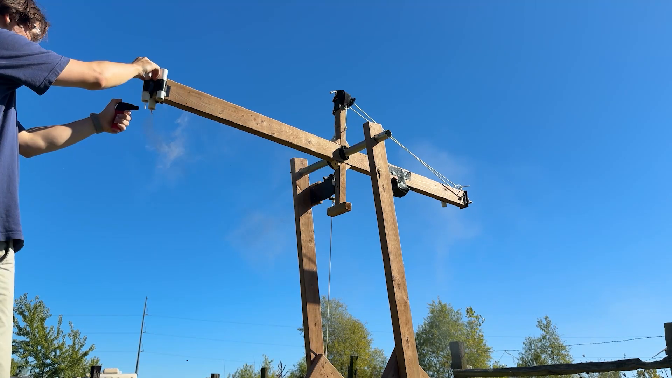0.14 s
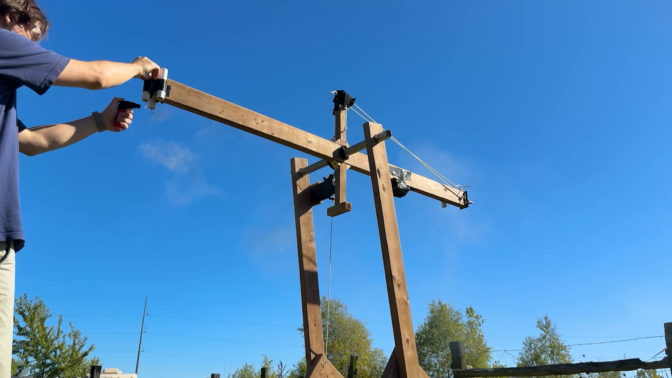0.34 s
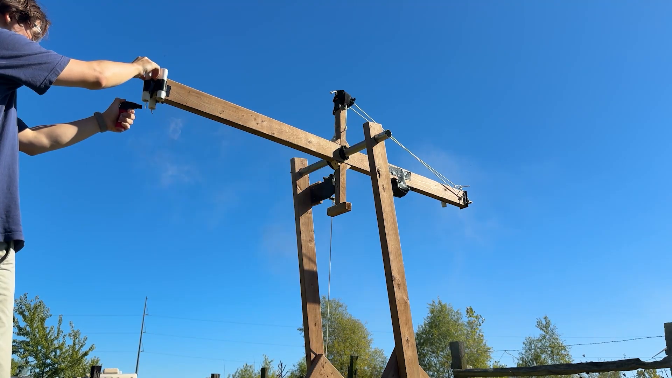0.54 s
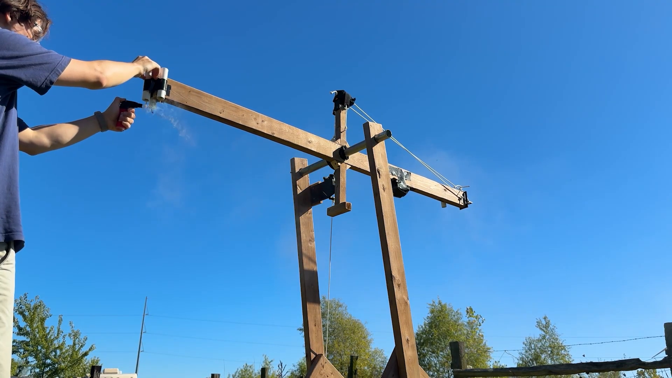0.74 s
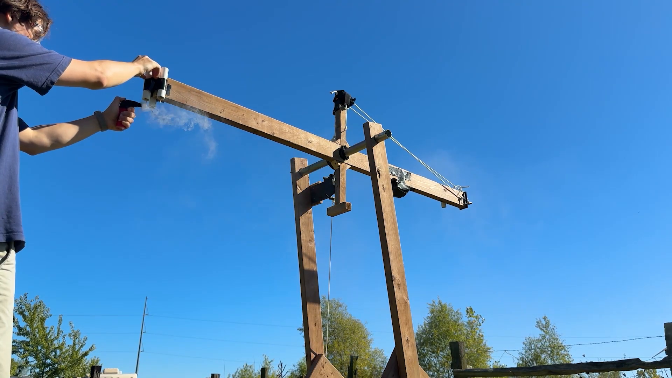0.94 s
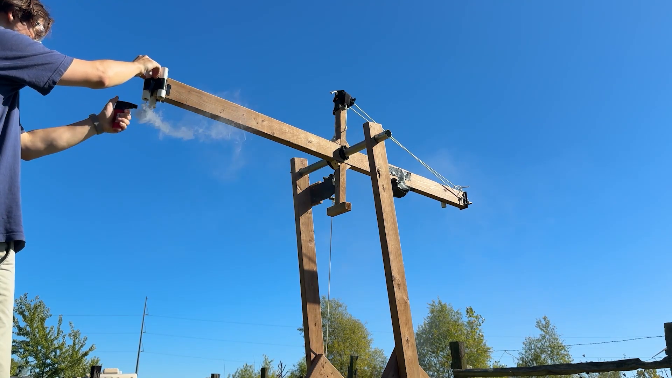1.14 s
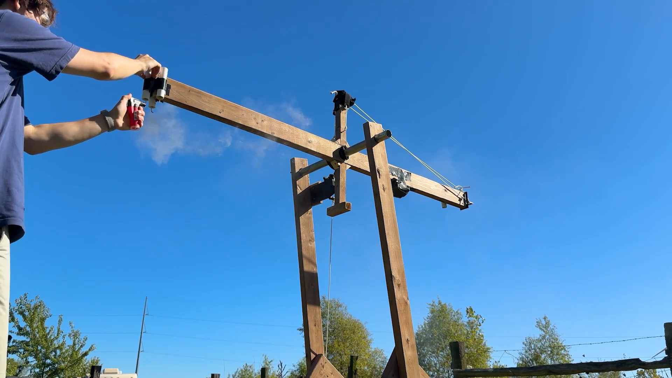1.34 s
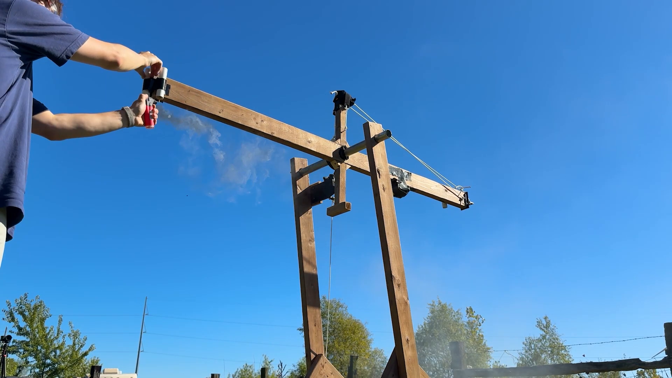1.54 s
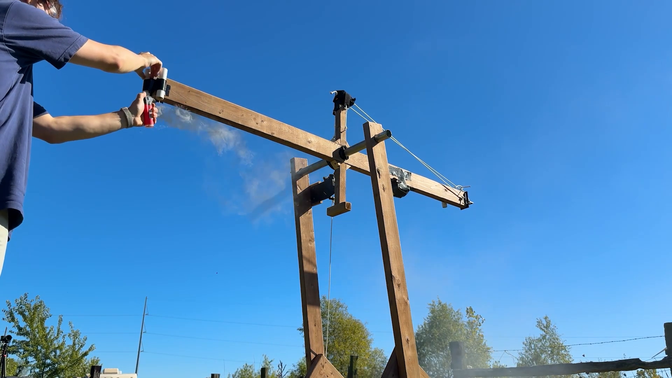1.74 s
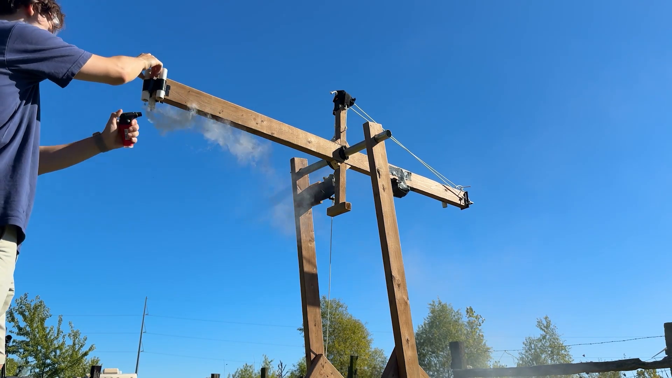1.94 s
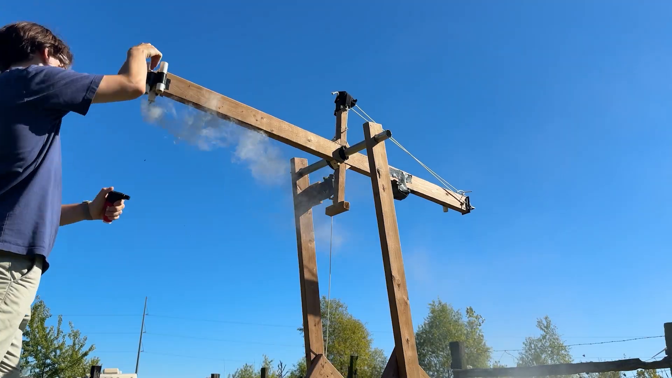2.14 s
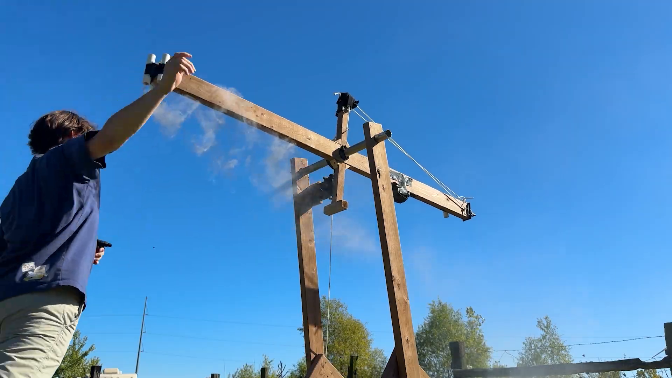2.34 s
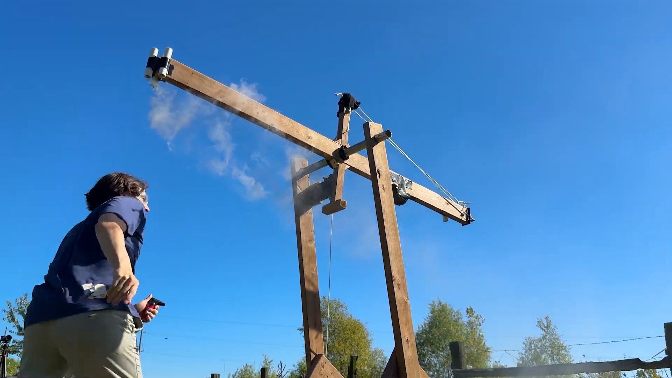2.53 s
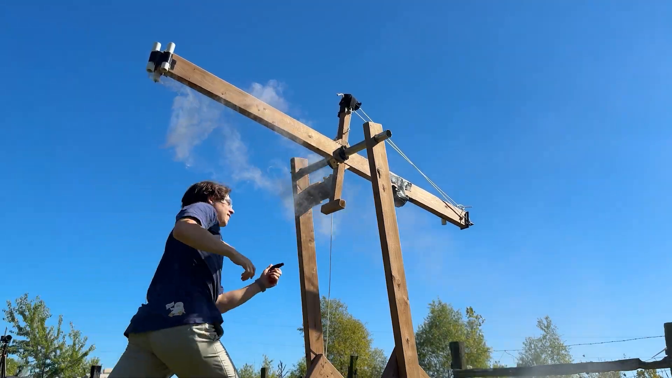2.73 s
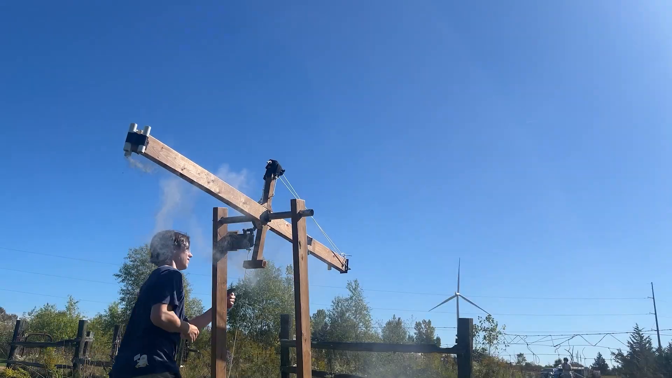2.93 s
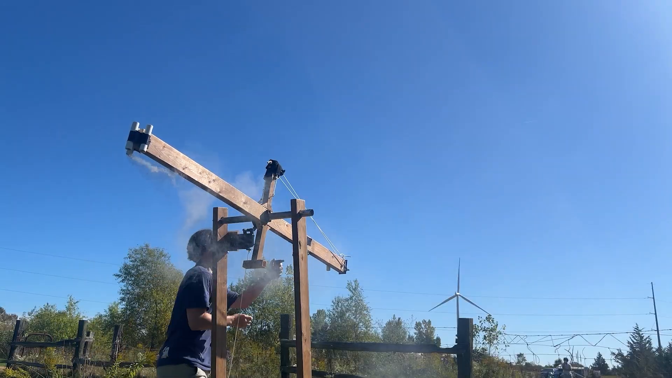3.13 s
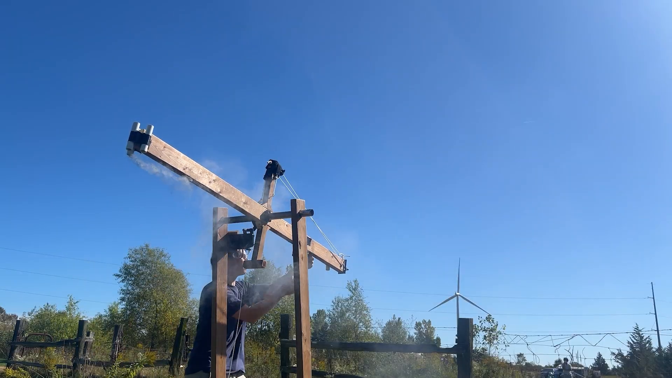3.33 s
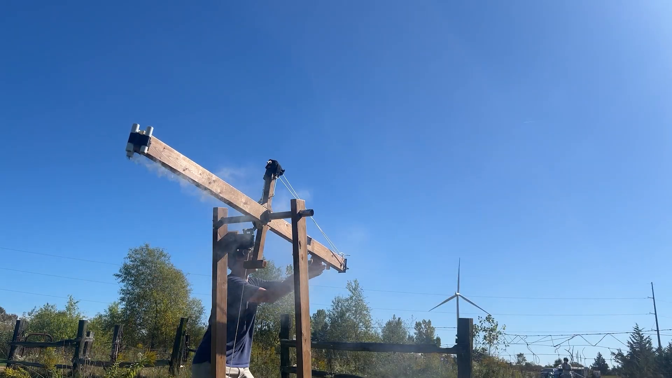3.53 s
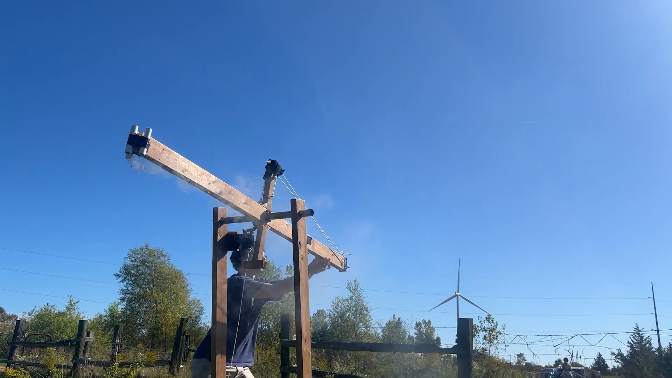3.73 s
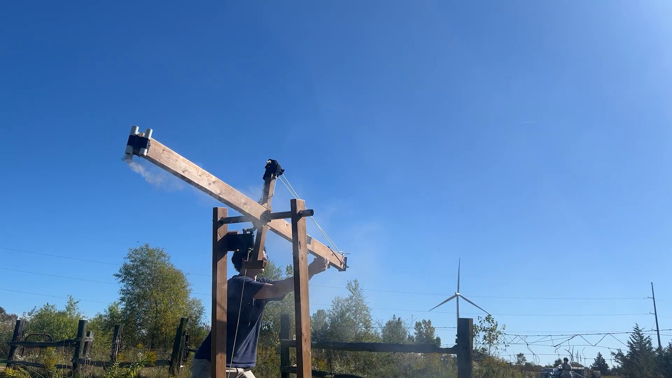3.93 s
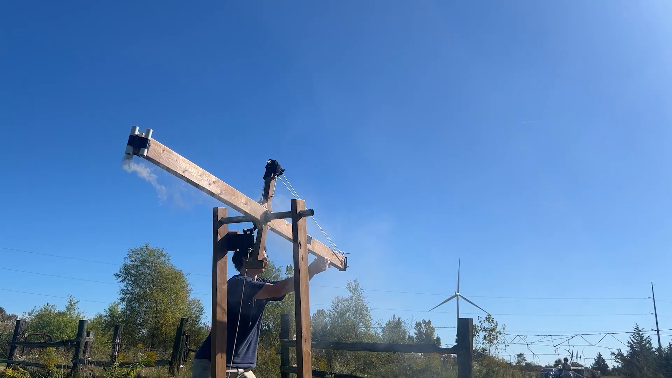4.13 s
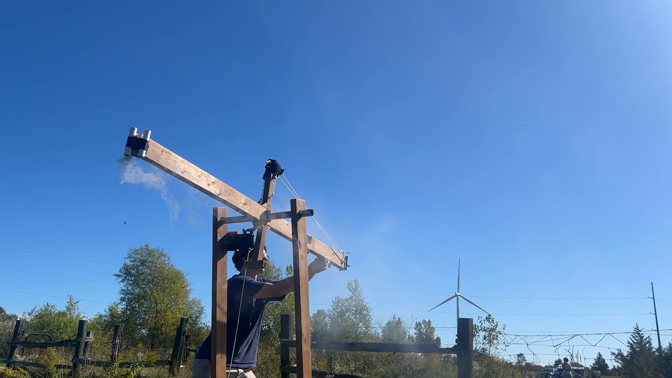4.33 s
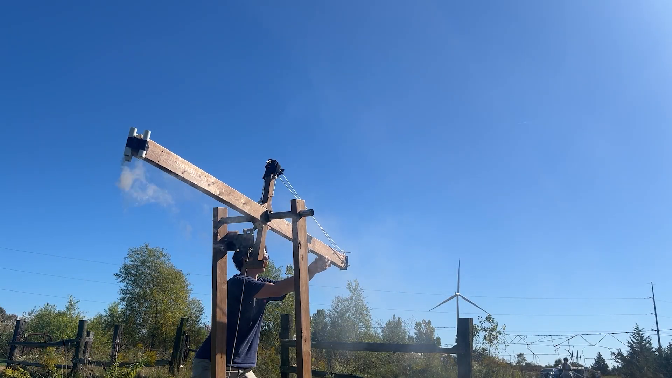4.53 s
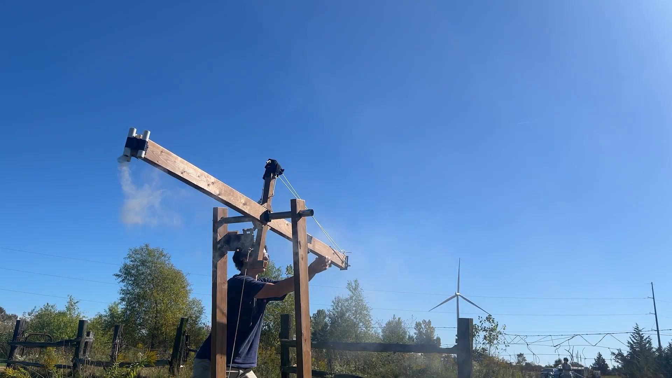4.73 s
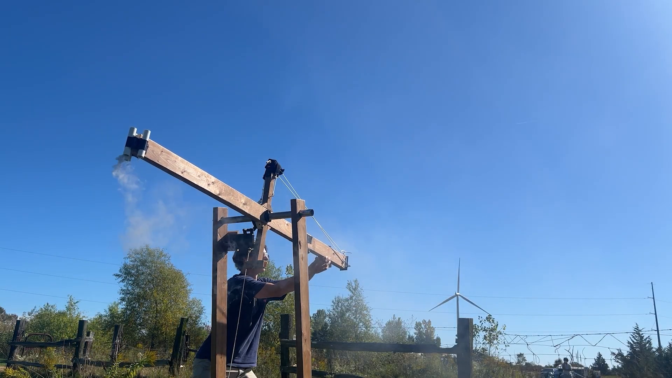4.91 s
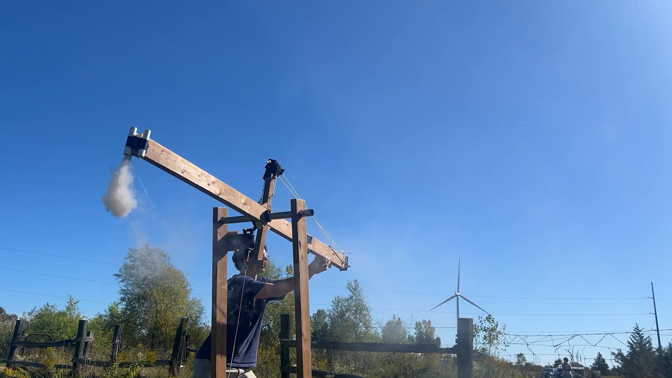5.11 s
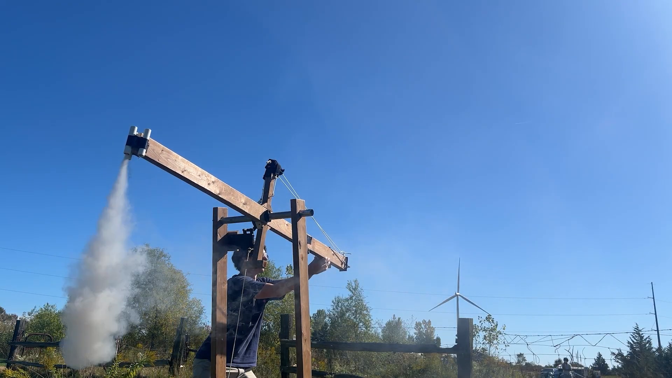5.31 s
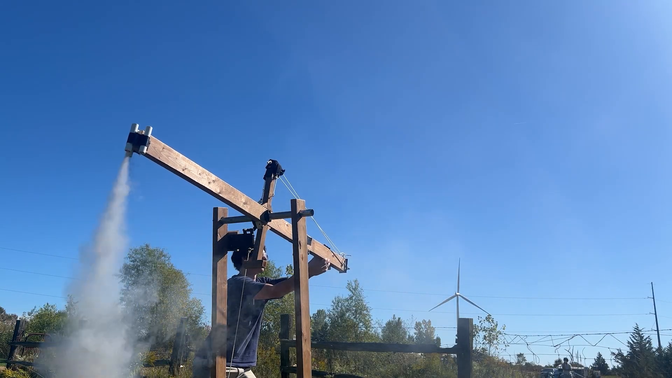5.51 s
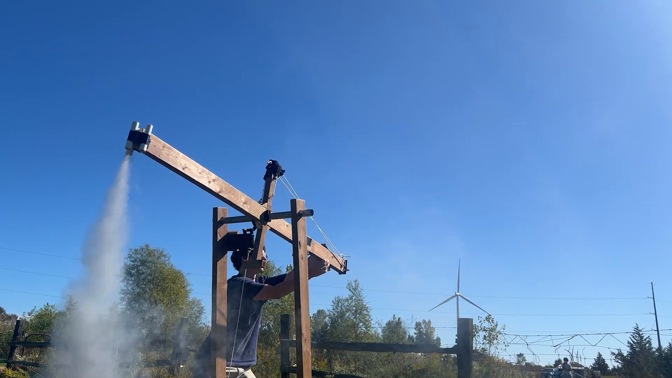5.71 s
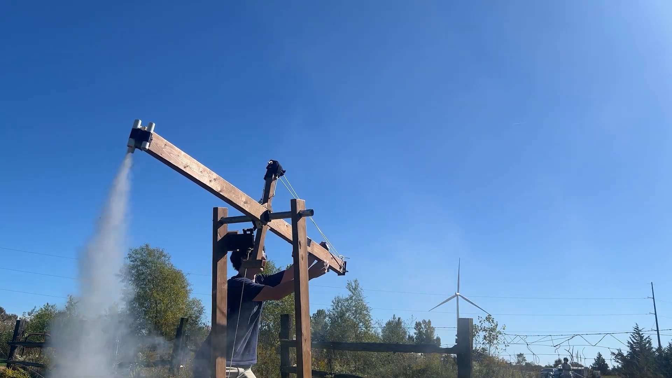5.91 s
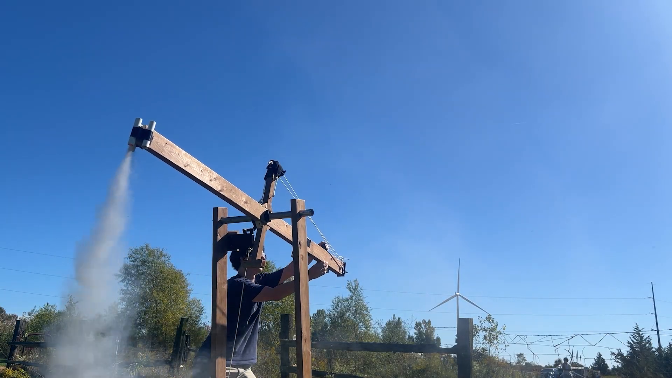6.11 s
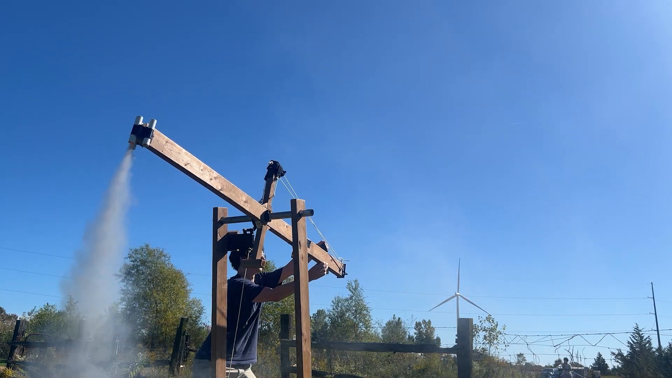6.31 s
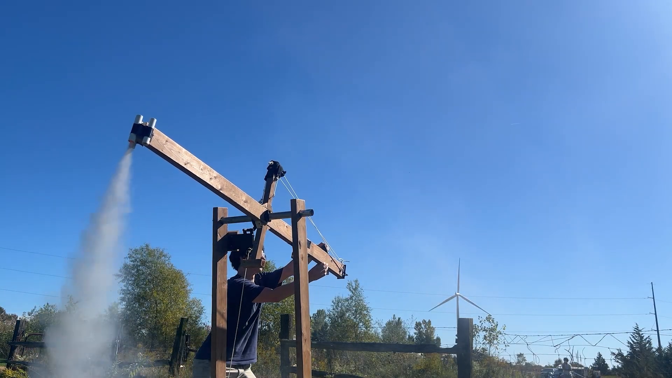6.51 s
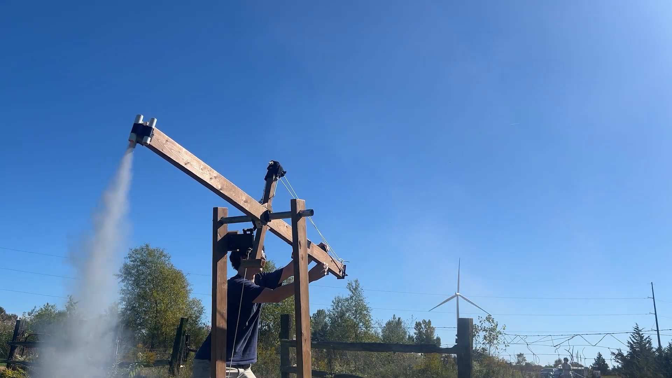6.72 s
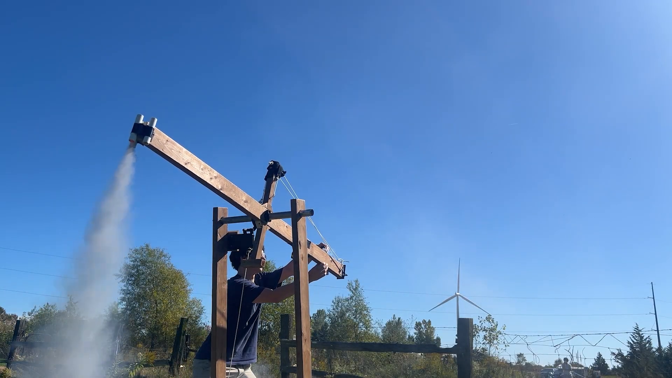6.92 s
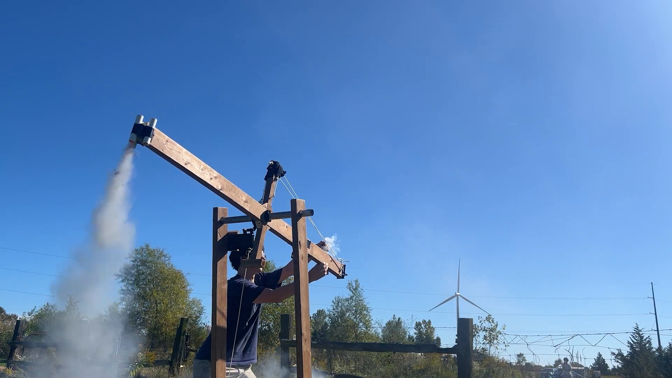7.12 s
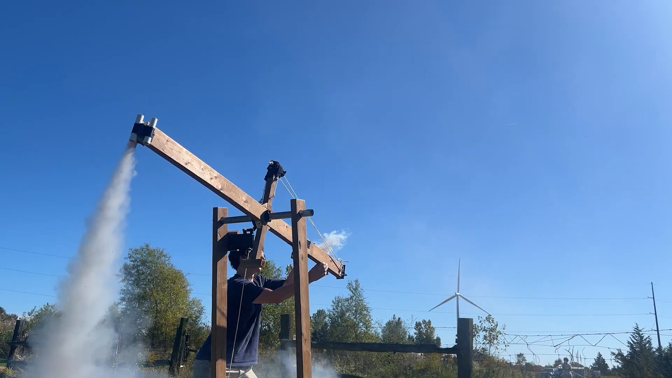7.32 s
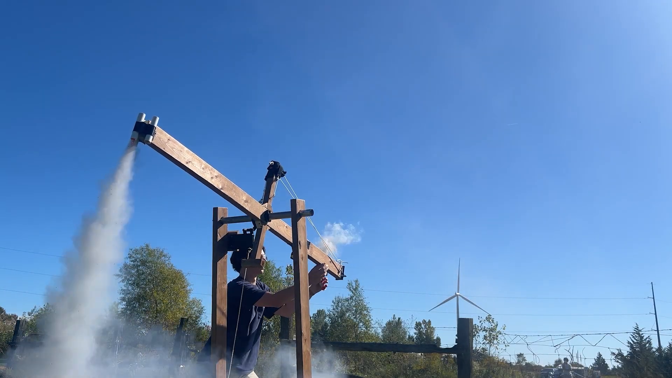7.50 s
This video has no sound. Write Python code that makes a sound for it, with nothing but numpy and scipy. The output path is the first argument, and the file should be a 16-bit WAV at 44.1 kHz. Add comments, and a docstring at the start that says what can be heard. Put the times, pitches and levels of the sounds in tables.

```python
"""A fuse sizzles on a small rocket motor on a wooden beam in a field; then the motor lights and roars.
Fuse, flame and jet are noise with moving spectra; two crickets chirp in trains of gliding tones.
A lighter clicks with damped modes; feet thump and rustle in the grass over a far hum and low rumble.
At 2.8 s the view cuts to a place farther off, where the burning also has its ground echo."""
import sys
import numpy as np
from scipy import signal
from scipy.fft import rfft, irfft
from scipy.io import wavfile
from scipy.ndimage import uniform_filter1d

SR = 44100
rng = np.random.default_rng(int(sys.argv[2]) if len(sys.argv) > 2 else 0)


def unload_wav(signal):
    """Save mono or channel-first audio to the path in sys.argv[1] as 16-bit WAV at rate SR, clipped to [-1, 1]."""
    wavfile.write(
        sys.argv[1],
        SR,
        np.round(np.clip(np.atleast_2d(signal).T, -1, 1) * 32767).astype(np.int16),
    )


N = 337613
CUT_S = 2.802  # the view cuts to a place farther off


def gain_of(db):
    """dB to gain."""
    return 10 ** (np.asarray(db) / 20)


def evened(x):
    """Scales to rms 1."""
    return x / np.sqrt(np.mean(x ** 2) + 1e-20)


def spectrum_at(points, hz):
    """Spectrum in dB, straight between points on a log-frequency axis."""
    point_hz, db = np.transpose(points)
    return np.interp(np.log(hz + 1), np.log(point_hz + 1), db)


def follow(rows, x):
    """Columns of a curve, interpolated at x along its first column."""
    row_x, *columns = np.transpose(rows)
    return [np.interp(x, row_x, column) for column in columns]


def add(mix, start_s, sound):
    """Adds a two-channel sound at start_s, cut to the mix."""
    i = round(start_s * SR)
    part = mix[:, max(i, 0):i + sound.shape[1]]
    part += sound[:, max(-i, 0):][:, :part.shape[1]]


def wander(t, top_hz):
    """Slow random drift of rms 1: 24 sines of random phase, the slower ones stronger."""
    total = 0
    for hz in np.geomspace(top_hz / 30, top_hz, 24):
        total = total + np.sin(2 * np.pi * (hz * t + rng.random())) / np.sqrt(hz)
    return evened(total)


# Stereo of the noise, near and far. Each row: frequency in Hz, phase lead of the left in radians,
# left minus right level in dB, likeness of the two channels from 0 to 1.
STEREO_NEAR = [(0, 0, -1.5, .98), (300, .4, -1.5, .97), (860, 1.34, 6.8, .87), (1550, 2, 3, .9),
               (2100, 2.1, .5, .93), (2420, 2.75, 0, .95), (2650, 3.12, 0, .999), (3300, 3.16, 0, .999),
               (4480, 5.4, 4.4, .64), (5690, 4.8, 4.4, .55), (6890, 6.27, .2, .9), (7750, 7, .3, .66),
               (9300, 6.28, 0, .99), (9990, 6.1, .1, .83), (10340, 5.1, 0, .66), (11700, 4.2, 0, .8),
               (12100, 3.16, 0, .999), (13800, 3.12, 0, .999), (14300, 2.3, .2, .7), (15850, .65, 0, .7)]
STEREO_FAR = [(0, 0, -2.5, .98), (300, .5, -1.5, .98), (520, 1, -.3, .98), (700, 1.36, 2.4, .98),
              (860, 1.45, 4.3, .97), (1030, 1.42, 4.8, .96), (2300, 2.65, -1, .9), (2580, 3.12, 0, .999),
              (2980, 3.16, 0, .999), (3500, 4, 2.5, .87), (4650, 5.7, 3.6, .83), (5860, 5.67, 6.1, .73),
              (7580, 6.46, .5, .88), (8440, 7.46, -1.5, .46), (9470, 5.44, 1.6, .65), (9900, 3.2, 4.5, .7),
              (10400, 3.16, 0, .998), (10950, 3.12, 0, .998), (12500, .45, .8, .72), (13440, 0, 0, .99),
              (15850, -2.4, 0, .55)]


def hiss(near, far, tilt_rows, patchy_db, flicker_db, size=512):
    """Turbulent noise: random short-time spectra, stereo set per frequency; rms 1."""
    hop = size // 4
    t = np.arange(N // hop + 2) * hop / SR
    hz = np.fft.rfftfreq(size, 1 / SR)
    a, b, c, d, patches = rng.standard_normal((len(t), len(hz), 5)).T
    patches = uniform_filter1d(patches, size=6, axis=0)
    patches = evened(uniform_filter1d(patches, size=20, axis=1))

    is_far = t > CUT_S
    stereo_near = np.array(follow(STEREO_NEAR, hz))[..., None]
    stereo_far = np.array(follow(STEREO_FAR, hz))[..., None]
    lead, balance_db, same = np.where(is_far, stereo_far, stereo_near)
    same = np.clip(same, 0, 1)
    right = a + 1j * b
    left = same * right + np.sqrt(1 - same ** 2) * (c + 1j * d)
    left = left * np.exp(1j * lead)

    db = np.where(is_far, spectrum_at(far, hz)[:, None], spectrum_at(near, hz)[:, None])
    octaves = np.log2((hz[:, None] + 100) / 4000)
    db = db + octaves * follow(tilt_rows, t)[0]
    balance = np.array([gain_of(balance_db / 2), gain_of(-balance_db / 2)])
    # evens the frames before patches and flicker
    mean_power = (gain_of(db) ** 2 * (balance ** 2).mean(0)).mean(0)
    db = db + patchy_db * patches + flicker_db * rng.standard_normal(len(t))
    frames = np.array([left, right]) * balance * gain_of(db) / np.sqrt(mean_power)
    return evened(signal.istft(frames, nperseg=size, noverlap=size - hop)[1][:, :N])


# Sizzle over time. Each row: time in seconds, level in dB, tilt in dB per octave.
FUSE_CURVE = [(0.05, -43.5, 1), (0.052, -49, 3), (0.516, -60, 0), (0.634, -52, 0), (0.976, -43.5, 0.5),
              (1.16, -42, 0), (1.464, -42, 4), (1.466, -49, -2.5), (2.05, -41.5, 2), (2.632, -49, 2.5),
              (2.8, -45.5, 8), (2.802, -63, -0.5), (3.14, -53.5, 6), (3.36, -59, 3.5), (4.32, -54, 5.5),
              (4.59, -54, 2.5), (4.78, -55.5, 1), (4.93, -59, 1), (5.05, -47.5, -1.5)]
# Sizzle spectrum, near and far. Each row: frequency in Hz, relative density in dB per Hz.
FUSE_COLOUR_NEAR = [(345, -20), (1030, -9.5), (1700, -9), (2930, -6), (3500, -1), (3900, 1.5), (4800, -0.5),
                    (7400, -6), (10300, -2), (11400, 5.5), (12500, -3), (13950, -5), (15300, 2), (15850, 0)]
FUSE_COLOUR_FAR = [(345, -15.5), (860, -6.5), (2070, -12), (2760, -51), (3300, 2), (3960, -1), (4820, 1.5),
                   (7000, -1), (11000, -6.5), (14500, -10), (15850, -7.5)]


def fuse(t):
    """Powder spits and sizzles along the fuse: patchy noise of moving level and tilt."""
    tilt_rows = np.array(FUSE_CURVE)[:, ::2]
    sizzle = hiss(FUSE_COLOUR_NEAR, FUSE_COLOUR_FAR, tilt_rows, patchy_db=2.0, flicker_db=0.75)
    return gain_of(follow(FUSE_CURVE, t)[0]) * sizzle


# Low breathy flame, swelling as the motor lights. Each row: time in seconds, level in dB.
FLAME_LEVEL = [(0.05, -60), (0.052, -77), (0.25, -104), (0.49, -74), (0.94, -62.5), (1.23, -62),
               (1.5, -56.5), (1.78, -55), (2.03, -59.5), (2.5, -70), (2.8, -73), (2.802, -75), (3.15, -67),
               (3.4, -71), (4.32, -70), (4.66, -58), (4.89, -69), (4.94, -59.5), (5.03, -60), (5.09, -58),
               (5.15, -56), (5.4, -44)]
# Flame spectrum, near and far. Each row: frequency in Hz, relative density in dB per Hz.
FLAME_COLOUR_NEAR = [(200, -33), (430, -14.5), (620, -4.5), (820, 2), (1030, -14), (1280, 2.5),
                     (1600, -11.5), (1900, -8), (2600, -10), (4000, -29), (6000, -34)]
FLAME_COLOUR_FAR = [(200, -20), (550, -9), (790, 0.5), (990, 1), (1170, 3), (1400, -2.5), (1600, 2),
                    (2600, -9), (4000, 3.5), (6000, -10)]


def flame(t):
    """Soft flame roar: noise in a few broad resonances."""
    roar = hiss(FLAME_COLOUR_NEAR, FLAME_COLOUR_FAR, [(0, 0.035)], patchy_db=2.0, flicker_db=1.0)
    return gain_of(follow(FLAME_LEVEL, t)[0]) * roar


# Exhaust over time. Each row: time in seconds, level in dB, tilt in dB per octave.
JET_CURVE = [(4.95, -69, 4), (5.0, -65, 3), (5.06, -54.5, 2.5), (5.1, -47, -0.5), (5.14, -42, -1),
             (5.19, -38, -1.5), (5.24, -36, -0.6), (5.4, -32, -0.6), (5.67, -32.5, -0.8),
             (5.9, -29.5, -0.56), (6.08, -28.5, -0.5), (6.14, -26.5, -0.75), (6.8, -27.5, -0.83),
             (7.1, -29, -2.5), (7.128, -32, -0.5), (7.131, -35, -2.5), (7.66, -39.5, -3.5)]
# Exhaust spectrum. Each row: frequency in Hz, relative density in dB per Hz.
JET_SPECTRUM = [(60, -59), (200, -9.5), (345, -8.5), (690, -4), (1100, -2.5), (2000, 0), (2950, -1),
                (3250, 4.5), (3800, -0.5), (5150, -1.5), (5450, -5), (5700, 0), (6100, -4), (7300, -3.5),
                (7650, -9.5), (8050, -7), (10000, -7), (12000, -9.5), (14000, -9), (16000, -12.5)]
SPUTTER_DB, SPUTTER_HZ, SETTLE_S = 3, 40, .15  # the jet sputters until it settles
HOLLOW_HZ, HOLLOW_SHARE, FILL_S = (1500, 2630), 0.62, 0.84  # a young jet is hollow here, then fills


def jet(t):
    """Turbulent exhaust that catches unevenly: noise, first hollow and sputtering, then full."""
    rows = np.array(JET_CURVE)
    rush = hiss(JET_SPECTRUM, JET_SPECTRUM, rows[:, ::2], patchy_db=0.75, flicker_db=0.32)
    since_s = np.maximum(t - rows[0, 0], 0)
    middle = signal.sosfilt(signal.butter(1, HOLLOW_HZ, "band", fs=SR, output="sos"), rush)
    rush = rush - HOLLOW_SHARE * np.exp(-(since_s / FILL_S) ** 2) * middle
    slow = t[::100]
    unevenness = np.interp(t, slow, wander(slow, SPUTTER_HZ))
    sputter_db = SPUTTER_DB * np.exp(-since_s / SETTLE_S) * unevenness
    onset = np.minimum(since_s / 0.035, 1)
    return gain_of(follow(rows, t)[0] + sputter_db) * onset * rush


GROUND_S, GROUND_SHARE, GROUND_HZ = .00247, .38, 2100  # echo delay, gain, low-pass corner


def echoed(x):
    """Adds the echo off the ground, whose grass swallows the treble."""
    dulled = signal.sosfilt(signal.butter(1, GROUND_HZ, fs=SR, output="sos"), x)
    return x + GROUND_SHARE * np.roll(dulled, round(GROUND_S * SR), axis=1)


# Runs of even strokes, some dragging at the end. Each row: first stroke in seconds, last in seconds,
# drag in seconds, cricket (0 low, 1 high), level in dB.
STROKE_RUNS = [(0.001, 0.001, 0, 0, -38), (0.005, 0.767, 0, 1, -49), (0.05, 0.05, 0, 0, -39),
               (0.104, 0.39, .011, 0, -36), (0.535, 1.441, 0, 0, -36.4), (1.472, 2.773, 0, 0, -36.3),
               (1.57, 2.764, 0, 1, -47.5), (2.836, 4.25, 0, 1, -40.5), (2.852, 3.486, .013, 0, -43.5),
               (3.57, 4.251, 0, 0, -43.8), (4.305, 5.28, 0, 1, -40.5), (4.324, 5.289, 0, 0, -43.5),
               (5.335, 5.714, 0, 1, -42), (7.157, 7.612, 0, 0, -47.5), (7.168, 7.652, 0, 1, -44.5)]
STROKE_GAP_S = (.0566, .0543)  # usual gap, low and high cricket
STROKE_SPREAD_DB, STROKE_JITTER_S = 0.5, .0006


def strokes():
    """Spreads each run into strokes of (seconds, cricket, level in dB) with small random scatter."""
    rows = []
    for first_s, last_s, drag_s, cricket, db in STROKE_RUNS:
        high = int(cricket > .5)
        even_s = last_s - first_s - drag_s
        gaps = round(even_s / STROKE_GAP_S[high])
        u = np.arange(gaps + 1) / max(gaps, 1)
        late, loud = rng.standard_normal((gaps + 1, 2)).T
        s = first_s + even_s * u + drag_s * u ** 4 + STROKE_JITTER_S * late
        rows += zip(s, [high] * len(s), db + STROKE_SPREAD_DB * loud)
    return rows


# One wing stroke. Each row: time from the middle in ms, pitch in Hz, level in dB.
WING_LOW = [(-11, 8230, -40), (-9, 8300, -6), (-6, 8370, -3), (0, 8410, 0), (4, 8330, -1), (7, 8100, -4),
            (10, 7750, -8), (13, 7500, -40)]
WING_HIGH = [(-8, 8500, -40), (-5, 8620, -5), (-2, 8670, -2), (1, 8630, 0), (4, 8400, -3), (7, 8080, -7),
             (10, 7850, -40)]
# Place of each cricket: low then high, each near then far.
# Each pair: left minus right level in dB, phase lead of the left in radians.
CRICKET_PLACES = [
    [(2.1, -0.15), (6, 1.47)],
    [(-11, 0.014), (12.5, 0.87)],
]


def crickets():
    """Each wing stroke is a near-pure tone that arches and drops, with a faint scattered tail."""
    out = np.zeros((2, N))
    ms = np.arange(-660, 660) / SR * 1000
    chirps = strokes()
    for (s, high, db), start in zip(chirps, rng.random(len(chirps))):
        hz, shape_db = follow((WING_LOW, WING_HIGH)[high], ms)
        pan_db, lead = CRICKET_PLACES[high][int(s > CUT_S)]
        angle = 2 * np.pi * (np.cumsum(hz) / SR + start)
        pair = gain_of([[pan_db], [0]]) * np.sin([angle + lead, angle])
        pair = pair / np.hypot(1, gain_of(pan_db))
        envelope = uniform_filter1d(gain_of(shape_db), size=100)
        add(out, s + ms[0] / 1000, gain_of(db) * envelope * pair)
    # grass and posts scatter a faint smear after each stroke
    taps = rng.standard_normal((2, 3000)) * gain_of(-60 * np.arange(3000) / SR / 0.96)
    taps = taps / np.linalg.norm(taps[0])
    return out + gain_of(-11.0) * signal.oaconvolve(out, taps, axes=1)[:, :N]


# Each row: start in seconds, peak in dB before scatter, pitch factor, crack above ring in dB,
# lower modes in dB, upper modes in dB per octave, scatter in dB, share of the ring time,
# extra left minus right level in dB.
LIGHTER_CLICKS = [(0.4470, -10.5, 1, -8, -9, 0, -43, .8, 1), (1.1524, -26, 1.18, -14, 2, -3, -60, .3, 2),
                  (3.6499, -34, 1, -14, 6, -7, -36, .7, -3), (3.6525, -37, .95, -20, 7, -14, -38, .6, -3),
                  (3.669, -48, 1, -20, 0, -12, -36, .8, 6)]
# Modes of the casing. Each row: frequency in Hz before the pitch factor, level in dB,
# t60 in seconds before the ring share.
LIGHTER_MODES = [(900, -34, .03), (2000, -18, .008), (3450, -9, .022), (3930, 0, .015), (4500, -4, .01),
                 (6200, -8, .007), (6834, -16, .024), (8300, -5, .004), (11000, -3, .004)]


def lighter():
    """A crack, the ring of the casing in damped modes, and a short scatter off the frame."""
    out = np.zeros((2, N))
    t = np.arange(4096) / SR
    high_pass = signal.butter(2, 2600, "high", fs=SR, output="sos")  # too small to push bass
    for s, db, pitch, crack_db, body_db, tilt_db, scatter_db, ring_share, pan_db in LIGHTER_CLICKS:
        ring = 0
        for hz, mode_db, t60_s in LIGHTER_MODES:
            level_db = mode_db + body_db * (hz < 3000) + tilt_db * max(np.log2(hz / 4000), 0)
            decay_db = -60 * t / (t60_s * ring_share)
            ring = ring + gain_of(level_db + decay_db) * np.sin(2 * np.pi * hz * pitch * t)
        ring = ring / abs(ring).max()
        crack = rng.standard_normal(len(t)) * gain_of(crack_db - 60 * t / .005)
        crack = signal.sosfilt(high_pass, crack)
        blow = (ring + crack) * np.minimum(t / .001, 1)
        blow = blow / abs(blow).max()

        stereo = STEREO_FAR if s > CUT_S else STEREO_NEAR
        lead, balance_db, _ = follow(stereo, np.fft.rfftfreq(len(t), 1 / SR))
        right = irfft(rfft(blow) * np.exp(-1j * lead) * gain_of(-balance_db - pan_db))
        right = right * (t < .06)  # cuts the wrap-around
        scatter = rng.standard_normal((2, len(t))) * gain_of(scatter_db - 60 * t / .09 + [[2], [-2]])
        tail = signal.oaconvolve(blow[None, :70], scatter, axes=1)[:, :len(t)]
        add(out, s, gain_of(db) * (np.array([blow, right]) + tail))
    return out


# Each row: start in seconds, peak in dB, thump in Hz, t60 in seconds, scuff above thump in dB.
FOOTFALLS = [(2.572, -50, 200, .05, -4), (2.582, -45, 300, .045, -3), (2.609, -53, 250, .05, 0),
             (2.649, -44, 750, .02, 2), (2.664, -49, 260, .06, -2), (2.695, -52, 240, .06, -2),
             (2.749, -49, 120, .06, -10), (2.85, -55, 2000, .02, 3), (2.858, -49, 110, .07, -15),
             (2.887, -51, 1200, .02, 3), (3.246, -55, 320, .05, 0), (3.266, -61, 1800, .03, 3)]


def steps():
    """Foot thumps: a damped knock and a scuff of noise around the same pitch."""
    out = np.zeros((2, N))
    t = np.arange(4000) / SR
    puffs = rng.standard_normal((len(FOOTFALLS), len(t)))
    for (s, db, hz, t60_s, scuff_db), puff in zip(FOOTFALLS, puffs):
        band = signal.butter(1, [hz * 0.27, hz * 1.9], "band", fs=SR, output="sos")
        scuff = evened(signal.sosfilt(band, puff))
        thump = np.sin(2 * np.pi * hz * t) + gain_of(scuff_db) * scuff
        thump = thump * gain_of(-60 * t / t60_s) * np.minimum(t / 0.0018, 1)
        pair = np.array([thump, np.roll(thump, -8)])  # right leads by 8 samples
        add(out, s, gain_of(db) * pair / abs(thump).max())
    return out


# Grass and cloth. Each row: start in seconds, length in seconds, level in dB before the envelope,
# low edge in Hz, high edge in Hz.
GRASS_RUSTLES = [(2.39, 0.15, -64.5, 250, 2220), (2.582, 0.15, -67, 200, 1000),
                 (2.817, .09, -77, 200, 2500), (3.235, .065, -73, 350, 3000)]
SNAPS_PER_S, SNAP_SPREAD_DB = 1500, 4


def rustle():
    """Dense small snaps of uneven size, band-passed, under a quick rise and slow fall."""
    out = np.zeros((2, N))
    for s, length_s, db, low_hz, high_hz in GRASS_RUSTLES:
        chance, size, sign = rng.random((3, SR // 4))[:, :round(length_s * SR)]
        heights = gain_of(-SNAP_SPREAD_DB * np.log(size + .01)) * np.sign(sign - .5)
        snaps = (chance < SNAPS_PER_S / SR) * heights
        band = signal.butter(2, [low_hz, high_hz], "band", fs=SR, output="sos")
        sound = evened(signal.sosfilt(band, snaps))
        sound = sound * np.sin(np.pi * np.linspace(0, 1, len(sound)) ** .7) ** .5
        pair = np.array([sound, np.roll(sound, -8)])  # right leads by 8 samples
        add(out, s, gain_of(db + np.array([[1.5], [-1.5]])) * pair)
    return out


# Each row: frequency in Hz, near level in dB, far level in dB.
HUM_LINES = [(92, -61.5, -62.5), (150, -64.5, -71.5)]


def hum(t):
    """Far hum: low sines wavering in pitch and level."""
    total, slow = 0, t[::400]
    for hz, near_db, far_db in HUM_LINES:
        db = np.where(t > CUT_S, far_db, near_db)
        turns = np.cumsum(hz * (1 + 0.01 * np.interp(t, slow, wander(slow, 6.7)))) / SR
        waver_db = 1.2 * np.interp(t, slow, wander(slow, 8))
        total = total + gain_of(db + waver_db) * np.sin(2 * np.pi * turns)
    return total * gain_of([[-1.2], [1.2]])  # right louder


# Each row: time in seconds, level in dB.
RUMBLE_LEVEL = [(0.0, -56.5), (0.32, -61.5), (1.07, -57.5), (2.6, -55), (3.4, -60), (5.2, -62), (5.52, -55),
                (7.2, -53.5), (7.48, -61), (7.66, -58)]
# Rumble spectrum, near and far. Each row: frequency in Hz, relative density in dB per Hz.
RUMBLE_COLOUR_NEAR = [(20, -52), (35, -41), (55, -6), (75, 0.5), (95, -6.5), (120, -2), (150, -11),
                      (200, -13), (350, -26), (800, -21)]
RUMBLE_COLOUR_FAR = [(20, -55), (35, -51), (55, -6), (75, 5.5), (95, -9.5), (120, -3.5), (150, -11.5),
                     (200, -18.5), (300, -29), (800, -28.5)]
# Brief swells. Each row: middle in seconds, rise in dB.
RUMBLE_SWELLS = [(1.48, 4), (1.73, 5.5), (2.0, 1), (2.66, 6), (2.77, 6.5), (2.88, 3), (3.28, 3.5),
                 (4.58, 4), (6.459, 4.5), (6.61, -1), (7.16, -2)]
SWELL_S, RUMBLE_WANDER_DB = 0.048, -0.6  # swell half-width at 1/e of its dB


def rumble(t):
    """Lumpy low noise with brief swells and a slow drift of level."""
    noise = hiss(RUMBLE_COLOUR_NEAR, RUMBLE_COLOUR_FAR, [(0, 0.0046)],
                 patchy_db=3.5, flicker_db=1.5, size=2048)
    slow = t[::400]
    swell_db = RUMBLE_WANDER_DB * wander(slow, 7.5)
    for s, rise_db in RUMBLE_SWELLS:
        swell_db = swell_db + rise_db * np.exp(-((slow - s) / SWELL_S) ** 2)
    return gain_of(follow(RUMBLE_LEVEL, t)[0] + np.interp(t, slow, swell_db)) * noise


def scene():
    """All sources in the field; from farther off the burning is combed by the ground echo."""
    t = np.arange(N) / SR
    burning = fuse(t) + flame(t) + jet(t)
    burning = np.where(t > CUT_S, echoed(burning), burning)
    return burning + crickets() + lighter() + steps() + rustle() + hum(t) + rumble(t)


EDGE_HZ = 15760


def record(dry):
    """Steep linear-phase low-pass at EDGE_HZ."""
    low_pass = signal.firwin(1023, EDGE_HZ, window=("kaiser", 9), fs=SR)
    return signal.oaconvolve(dry, low_pass[None], "same")


dry = scene()
out = record(dry)
unload_wav(out)
```